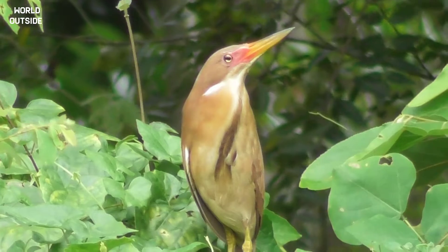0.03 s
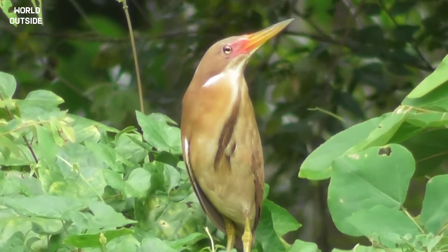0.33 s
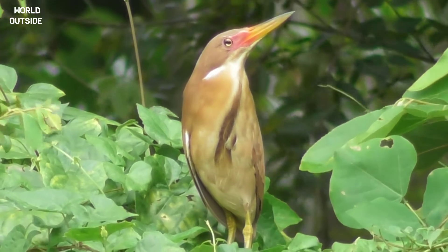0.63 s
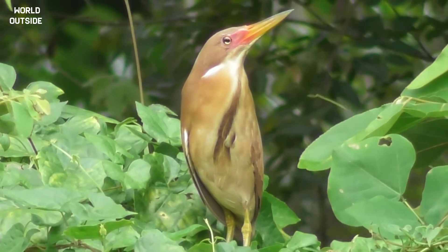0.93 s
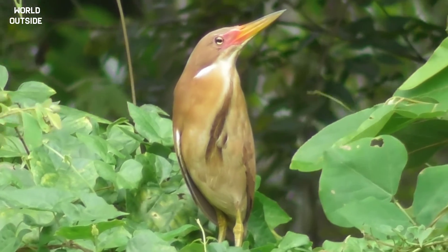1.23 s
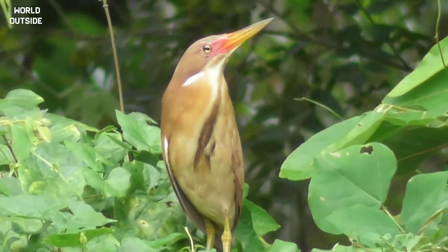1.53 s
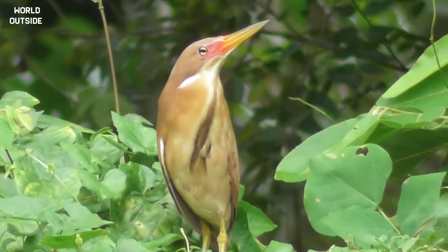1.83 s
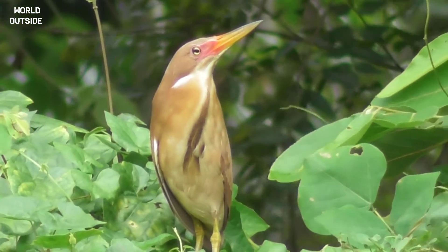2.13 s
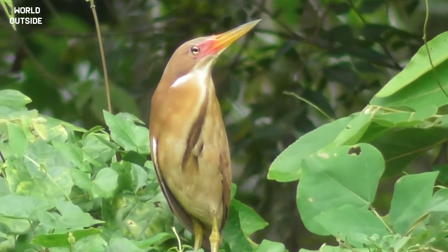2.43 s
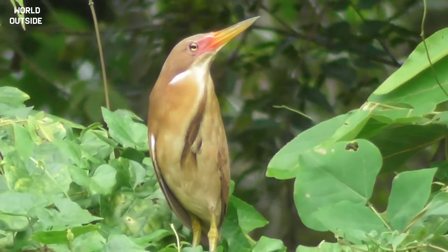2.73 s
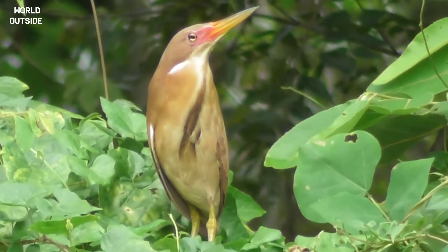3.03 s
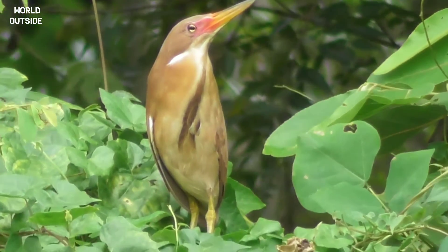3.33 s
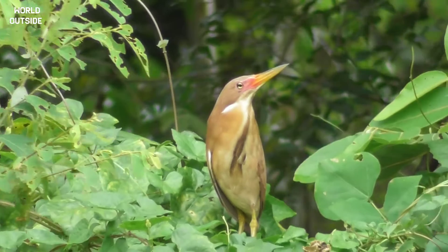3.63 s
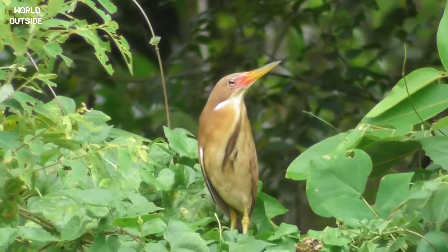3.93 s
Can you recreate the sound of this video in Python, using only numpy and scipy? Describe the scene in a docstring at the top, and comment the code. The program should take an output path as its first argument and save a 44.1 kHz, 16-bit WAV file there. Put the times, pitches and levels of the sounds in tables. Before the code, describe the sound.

A high insect chorus fills a leafy outdoor spot, one buzz swelling about once a second and another insect chirping early on. Wind bumps the microphone early and late, while birds call faintly and the camera lens softly whirs and ticks.

```python
"""Insects in dense greenery

A shrill chorus surrounds the microphone. The nearest insect buzzes in slow swells of scraped pulses;
off to the left a katydid chirps with its wings, higher in pitch, for the first two seconds. Three thin
trilled whistles rise through the leaves. Far off, birds twitter and give a quickening run of pips, and
a whine creeps upward. Wind bumps the microphone early and late; right beside it the camera's zoom motor
whirs and its lens ticks faintly."""
import sys
import numpy as np
from scipy import signal
from scipy.fft import rfft, irfft
from scipy.io import wavfile

SR = 44100
rng = np.random.default_rng(int(sys.argv[2]) if len(sys.argv) > 2 else 0)


def waveform_to_disk(signal):
    """Save audio, clipped to [-1, 1], as 16-bit WAV at the path in sys.argv[1]."""
    frames = np.transpose(np.atleast_2d(signal))
    scaled = np.clip(frames, -1, 1) * 32767
    samples = np.round(scaled).astype(np.int16)
    wavfile.write(sys.argv[1], SR, samples)


N = 176400
T = np.arange(N) / SR

# far insects: (centre [Hz], width [Hz], level [dB], left-right likeness [0..1], left over right [dB],
# right lag [samples])
CHORUS_BANDS = [(2058, 126, -75, 0.86, -2, 0), (7437, 510, -51.5, 1, 0, 0.26),
                (9104, 690, -60, 0.64, 1, 1.07), (10900, 1140, -69.5, 0.72, 6, 2)]
# swells of the nearest insect: (start [s], length [s], level [dB])
BUZZ_SWELLS = [(0.08, 0.78, -51.5), (1.12, 0.8, -52.5), (2.152, 0.69, -53.5), (3.214, 0.63, -49.5)]
# katydid chirps: (start [s], length [s], relative level [dB])
KATYDID_CHIRPS = [(0.03, 0.073, -59), (.24, .042, -65), (0.362, 0.057, -59), (0.482, 0.055, -55.5),
                  (.585, 0.067, -56), (0.693, 0.062, -55), (0.794, 0.089, -55.5), (0.91, 0.083, -57),
                  (1.016, 0.084, -56), (1.132, .072, -55.5), (1.242, 0.079, -57), (1.354, 0.089, -55),
                  (1.48, 0.076, -55.5), (1.597, 0.085, -55), (1.71, 0.078, -56)]
# rising whistles: (start [s], length [s], level [dB])
WHISTLES = [(-.038, 0.31, -57), (1.714, 0.28, -55), (3.32, .29, -57.5)]
# a far bird's quickening pips: (time [s], relative level [dB])
BIRD_PIPS = [(0.8828, -51), (0.975, -47.5), (1.061, -49), (1.1365, -47), (1.202, -51.5), (1.2678, -51.5),
             (1.323, -50), (1.38, -51), (1.4335, -55), (1.4863, -53), (1.537, -53.5), (1.587, -51),
             (1.635, -51), (1.6834, -65)]
# faint far calls: (start [s], length [s], pitch [Hz], level [dB])
FAR_CALLS = [(.468, .04, 1980, -69), (.557, .036, 3260, -66), (.622, .026, 3330, -68),
             (.766, .057, 3260, -66), (1.36, .08, 680, -55), (1.49, .54, 540, -56.5),
             (1.912, .045, 808, -57), (2.17, .07, 755, -58), (2.42, .09, 655, -54.5),
             (2.67, .07, 700, -55.5), (2.88, .08, 585, -56), (3.05, .08, 765, -58), (3.31, .09, 630, -55.5),
             (3.39, .08, 560, -56)]
# spells of far twittering: (start [s], length [s], pitch [Hz], level [dB])
TWITTERS = [(1.808, 0.15, 4450, -76), (2.17, 0.2, 4230, -71), (3.497, 0.39, 4080, -70.5),
            (3.62, .094, 5220, -78)]
# course of the distant whine: (time [s], pitch [Hz], level [dB])
WHINE_CURVE = [(0, 1224, -91), (1.6, 1253, -79), (2.08, 1271, -67.5), (2.8, 1305, -73.5),
               (3.05, 1312, -67.5), (3.35, 1305, -68.5), (3.57, 1316, -60), (3.7, 1338, -59.5),
               (3.785, 1320, -57.5), (3.805, 1318, -66), (3.88, 1342, -60), (4, 1348, -64)]
# wind rumble on the microphone: (time [s], relative level [dB])
RUMBLE_LEVELS = [(0, -34.5), (.19, -53), (.28, -40.5), (.38, -43.5), (.49, -35), (.53, -43), (.61, -37),
                 (.68, -40), (.76, -45), (.82, -42.5), (.93, -35), (1.03, -66.5), (3.47, -49.5),
                 (3.54, -38.5), (3.62, -34), (3.8, -37), (3.89, -43.5), (4, -35)]
# colour of the rumble: (frequency [Hz], relative density [dB])
RUMBLE_SPECTRUM = [(15, -32), (35, 0.5), (80, 1.5), (130, 1.5), (200, -7), (320, -18.5), (600, -33.5),
                   (1500, -38), (5000, -58.5)]
# flutter in strong gusts: (time [s], level [dB])
FLUTTER_LEVELS = [(0, -40.5), (.18, -55.5), (.29, -36.5), (.42, -50), (.52, -35), (.6, -28.5), (.69, -33),
                  (.77, -49), (1.05, -100), (3.48, -77), (3.62, -45), (3.75, -61), (3.83, -40.5), (4, -72)]
# colour of the flutter: (frequency [Hz], relative density [dB])
FLUTTER_SPECTRUM = [(30, -39), (100, -3.5), (170, 4), (320, -4), (450, -12), (700, -30.5), (1500, -75),
                    (5000, -68)]
# stereo image of the gusts: (frequency [Hz], left-right likeness [-1..1])
GUST_LIKENESS = [(25, 0.18), (55, 0.68), (120, 1), (300, 0.7), (1500, 0.85)]
# single buffets on the microphone: (time [s], relative level [dB], pitch [Hz])
BUFFETS = [(.109, -28, 95), (.2425, -26, 135), (.2995, -24.5, 120), (.3275, -28, 135), (.402, -26.5, 90),
           (.449, -26, 75), (.511, -21.5, 200), (.5835, -17, 187), (.5935, -20.5, 100), (.631, -16.5, 126),
           (.66, -22, 200), (.809, -26, 80), (.928, -27, 65), (3.595, -22, 66), (3.686, -24.5, 66),
           (3.774, -23, 56.7), (3.82, -27, 85), (3.843, -30, 250), (3.954, -28, 90)]
# zoom motor resonances: (centre [Hz], width [Hz], level [dB])
MOTOR_BANDS = [(3468, 60, -68.6), (3380, 330, -75), (650, 150, -56.2)]
# steps of the lens: (time [s], relative level [dB])
LENS_STEPS = [(2.757, -53), (2.777, -54), (2.817, -53), (2.837, -50), (2.857, -53), (2.877, -51),
              (2.957, -52), (2.997, -52), (3.017, -54), (3.037, -51), (3.057, -52), (3.097, -54),
              (3.137, -53), (3.177, -52), (3.197, -53), (3.217, -51.5), (3.237, -52), (3.637, -53),
              (3.657, -55), (3.677, -47.5), (3.697, -51), (3.737, -51), (3.777, -54), (3.817, -47.5),
              (3.857, -49), (3.897, -50), (3.917, -51), (3.957, -50.5)]
# ringing of the lens barrel: (frequency [Hz], gain [dB], time to fall 60 dB [s])
BARREL_MODES = [(2410, -2.5, 0.011), (2680, 1, 0.0047), (4000, -11, 0.0033)]
# sharp ticks, a row per resonance: (time [s], level [dB], centre [Hz], width [Hz], decay [s])
SNAPS = [(.219, -54.5, 3200, 1600, .003), (.338, -55, 3600, 1400, .003), (.645, -45.5, 4250, 850, .0027),
         (.6455, -55, 2900, 900, .003), (3.5058, -45.5, 2300, 4040, .0017)]
# colour of the outdoor air: (frequency [Hz], relative density [dB])
AIR_SPECTRUM = [(20, -11), (55, 3), (85, -1), (112, 3), (160, -5), (240, -10.5), (330, -15), (480, -17),
                (680, -17), (900, -23), (1250, -28.5), (1650, -36.5), (2080, -32), (2350, -35), (2800, -37),
                (3300, -33.5), (4150, -35), (5100, -44.5), (6200, -46.5), (8000, -32.5), (10000, -38.5),
                (12000, -39.5), (13200, -29.5), (15000, -35)]
# stereo image of the air: (frequency [Hz], left-right likeness [clipped to -1..1])
AIR_LIKENESS = [(25, -0.26), (55, 0.85), (120, 0.93), (330, 0.74), (1700, 0.72), (4000, 1), (6200, 1),
                (9000, 0.7), (11000, -.15), (14000, -1.1)]


def chorus(flicker_db=1.5):
    """Many far insects merge into steady shrill bands around the microphone."""
    out = 0
    for hz, width, db, alike, pan_db, lag in CHORUS_BANDS:
        shrill = band(white_pair(alike), hz, width)
        out += from_db(db + flicker_db * drift(2.4)) * place(shrill, pan_db, lag)
    return out


def buzzer(pulse_hz=173.7):
    """The nearest insect scrapes once per cycle of its sound organ, swelling about once a second."""
    effort = sum(from_db(db) * gate(s, length, rise=.26, fall=.25) for s, length, db in BUZZ_SWELLS)
    cycle = np.cumsum(pulse_hz * (1 + .026 * drift(12.7))) / SR % 1
    scrapes = white_pair(alike=.96) * np.sin(np.pi * cycle)
    return effort * band(scrapes, hz=7410, width_hz=570)


def katydid(stroke_hz=125, pitch_hz=8960, sweep_hz=1100, jitter_hz=130):
    """To the left, runs of wing strokes grow and stop short; in each stroke the scraper slows."""
    effort = sum(from_db(db - 1) * gate(s, length, rise=.021, fall=.0053)
                 for s, length, db in KATYDID_CHIRPS)
    stroke = np.cumsum(stroke_hz * (1 + .027 * drift(15))) / SR % 1
    falling_hz = pitch_hz + sweep_hz * (.5 - stroke) + jitter_hz * drift(920)
    scrape = rms_one(np.sin(np.pi * stroke) ** 2 * sine(falling_hz))
    return place([effort * scrape] * 2, pan_db=11.5, lag=1.2)


def whistles(from_hz=5350, to_hz=6840, glide_s=.06, trill_hz=92, trill_depth=.4):
    """Thin trilled whistles swell and slide up among the leaves, with a rasp just below their pitch."""
    out = 0
    for s, length, db in WHISTLES:
        hz = to_hz + (from_hz - to_hz) * np.exp(-np.maximum(T - s, 0) / glide_s)
        trill = 1 + trill_depth * sine(trill_hz * (1 + .1 * drift(30))) / np.sqrt(2)
        waver_hz = (25 + .09 * (to_hz - hz)) * drift(425)  # roughest at the foot of the slide
        rasp = from_db(-10) * sine(hz - 100) * drift(200)
        swell = gate(s, length, rise=.17, fall=.06) ** .68
        out += from_db(db) * swell * trill * (sine(hz + waver_hz) + rasp)
    return foliage(out, wet_db=-9, t60=.25)


def bird_pips(pip_s=.014, from_hz=930, to_hz=1200):
    """A far bird gives a quickening run of hollow pips, each flicked upward."""
    out = 0
    for s, db in BIRD_PIPS:
        hz = np.interp(T - s + .0033, [0, pip_s], [from_hz, to_hz])
        out += from_db(db - 1.5) * gate(s - .003, pip_s, rise=.0072, fall=.0078) * sine(hz)
    return foliage(out, wet_db=-12, t60=.2)


def far_calls(hoarseness=.012):
    """Faint, slightly hoarse bird notes carry through the greenery."""
    out = 0
    for s, length, hz, db in FAR_CALLS:
        voice = sine(hz * (1 + hoarseness * drift(107)))
        out += from_db(db) * gate(s, length, rise=.0069, fall=.0077) * voice
    return foliage(out, wet_db=-9, t60=.2)


def twitters(spread_hz=300, flicker_db=4.7):
    """Small far birds twitter unevenly, blurred by the leaves."""
    out = 0
    for s, length, hz, db in TWITTERS:
        level = from_db(db + flicker_db * drift(17)) * gate(s, length, rise=.022, fall=.04)
        out += level * sine(hz + spread_hz * drift(148.1))
    return foliage(out, wet_db=-15, t60=.14)


def whine(flicker_db=2.2):
    """A thin distant tone creeps upward and wavers, reaching each side a little differently."""
    hz, db = in_time(WHINE_CURVE)
    level = from_db(db + flicker_db * drift(13))
    mid = sine(hz + 7 * drift(24.5))
    side = sine(hz + 15 * drift(60))
    return level * pair(mid, side, alike=.86)


def gusts():
    """Wind rumbles on the microphone and flutters when strong."""
    rumble = from_db(in_time(RUMBLE_LEVELS)[0] + 1) * noise(RUMBLE_SPECTRUM, GUST_LIKENESS)
    flutter = from_db(in_time(FLUTTER_LEVELS)[0]) * noise(FLUTTER_SPECTRUM, GUST_LIKENESS)
    return rumble + flutter


def buffets(decay_cycles=.88):
    """Each buffet of wind shoves the microphone and dies within a cycle or two."""
    out = 0
    for s, db, hz in BUFFETS:
        cycles = np.maximum(T - s, 0) * hz
        envelope = np.exp(-cycles / decay_cycles) * (1 - np.exp(-6 * cycles))
        out += from_db(db + 3) * envelope * np.sin(2 * np.pi * cycles)
    return out


def zoom_motor():
    """Right beside the microphone, the zoom motor whirs in its resonances."""
    whir = sum(from_db(db) * band(white_pair(alike=.94), hz, width) for hz, width, db in MOTOR_BANDS)
    return whir * gate(start=.98, length=2.54, rise=.1, fall=.011)


def lens_ticks():
    """The lens steps in soft ticks that ring briefly in its barrel."""
    s, db = np.transpose(LENS_STEPS)
    out = 0
    for hz, mode_db, t60 in BARREL_MODES:
        steps = np.zeros(N)
        steps[(s * SR).astype(int)] = from_db(db + mode_db + .5 * rng.standard_normal(len(s)))
        radius, angle = from_db(-60 / (t60 * SR)), 2 * np.pi * hz / SR
        resonator = [1, -2 * radius * np.cos(angle), radius ** 2]
        out += signal.lfilter([0, np.sin(angle)], resonator, steps + 1e-18)
    return out


def snaps():
    """A few lone sharp ticks: one impulse each, with a short noisy tail in a broad resonance."""
    out = 0
    for s, db, hz, width, decay in SNAPS:
        tail = rng.standard_normal(N) * (T > s) * np.exp(-np.abs(T - s) / decay)
        impulse = np.diff(1.0 * (T > s), prepend=0) * np.sqrt(decay * SR)
        time_share = decay * SR / 2 / N  # sets the level over the tick's own brief span
        out += from_db(db) * band(impulse + tail, hz, width) * np.sqrt(time_share)
    return out


def air():
    """Steady outdoor air lies behind everything."""
    return from_db(-42) * noise(AIR_SPECTRUM, AIR_LIKENESS)


def foliage(x, wet_db, t60):
    """The direct sound reaches the microphone with scatter from leaves and trunks."""
    tail = rng.standard_normal((2, SR)) * from_db(-60 * T[:SR] / t60)
    tail /= np.sqrt(np.sum(tail ** 2, axis=1, keepdims=True))
    scatter = signal.fftconvolve(x[None], tail, axes=1)[:, :N]
    return (x + from_db(wet_db) * scatter) / np.sqrt(1 + from_db(2 * wet_db))


def from_db(db):
    """Decibels to gain."""
    return 10 ** (np.asarray(db) / 20)


def rms_one(x):
    """Scale to rms 1."""
    return x / np.sqrt(np.mean(x ** 2) + 1e-20)


def in_time(rows):
    """Each column of a curve, sample by sample."""
    s, *columns = np.transpose(rows)
    return [np.interp(T, s, column) for column in columns]


def at_hz(points, hz):
    """Read a spectrum on a log-frequency axis."""
    frequencies, values = np.transpose(points)
    return np.interp(np.log(hz + 1), np.log(frequencies), values)


def drift(rate_hz):
    """Random wander of rms 1, mostly slower than the given rate."""
    hz = np.arange(N // 2 + 1) * SR / N
    return rms_one(irfft(rfft(rng.standard_normal(N)) / (1 + (hz / rate_hz) ** 2), N))


def band(x, hz, width_hz):
    """A resonance with steep skirts; rms 1."""
    edges = np.clip([hz - width_hz / 2, hz + width_hz / 2], 20, .45 * SR)
    return rms_one(signal.sosfilt(signal.butter(2, edges, "band", fs=SR, output="sos"), x + 1e-18))


def gate(start, length, rise, fall):
    """Attack, hold and release, timed in seconds."""
    return np.clip((T - start) / rise, 0, 1) * np.clip((start + length - T) / fall, 0, 1)


def sine(hz):
    """A tone of rms 1 that follows a pitch curve."""
    return np.sqrt(2) * np.sin(2 * np.pi * np.cumsum(hz) / SR)


def pair(mid, side, alike):
    """Left and right from mid and side, with the given likeness."""
    alike = np.clip(alike, -1, 1)
    return (np.sqrt(1 + alike) * mid + np.sqrt(1 - alike) * side * np.array([[1], [-1]])) / np.sqrt(2)


def white_pair(alike):
    """Stereo white noise with the given likeness."""
    return pair(*rng.standard_normal((2, N)), alike)


def place(x, pan_db, lag):
    """Lean a stereo sound to the left by level and by a lag in samples."""
    delay = np.exp(-2j * np.pi * np.arange(N // 2 + 1) * lag / N)
    late_right = irfft(rfft(x[1]) * delay, N)
    return np.array([x[0] * from_db(pan_db / 2), late_right * from_db(-pan_db / 2)])


def noise(spectrum, likeness):
    """Stereo noise of a given colour; rms 1."""
    hz = np.arange(N // 2 + 1) * SR / N
    white = pair(*rfft(rng.standard_normal((2, N))), at_hz(likeness, hz))
    return rms_one(irfft(white * from_db(at_hz(spectrum, hz)), N))


def scene():
    """Everything heard from where the camera stands in the greenery."""
    insects = chorus() + buzzer() + katydid()
    among_leaves = whistles() + bird_pips() + far_calls() + twitters()
    at_microphone = gusts() + buffets() + zoom_motor() + lens_ticks()
    return insects + among_leaves + whine() + at_microphone + snaps() + air()


def record(dry, cutoff_hz=14200):
    """The camera cuts the highest treble steeply."""
    return signal.sosfilt(signal.cheby2(12, 70, cutoff_hz, fs=SR, output="sos"), dry)


dry = scene()
out = record(dry)
waveform_to_disk(out)
```